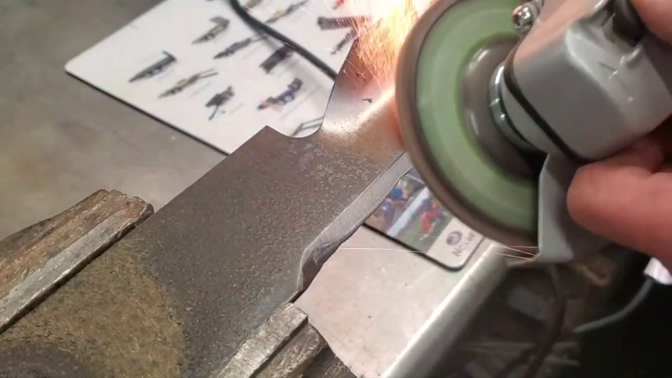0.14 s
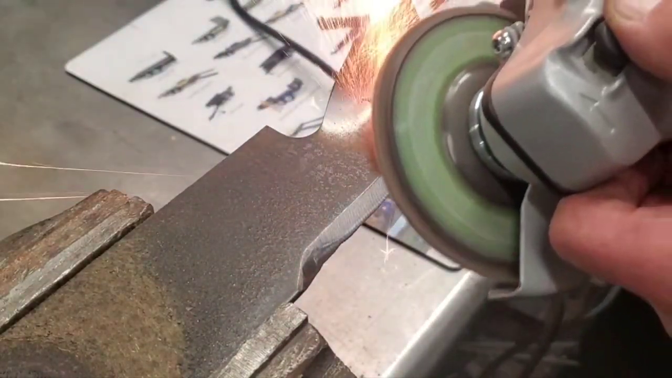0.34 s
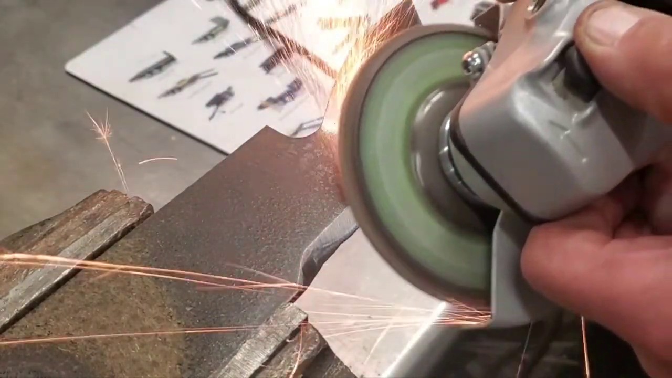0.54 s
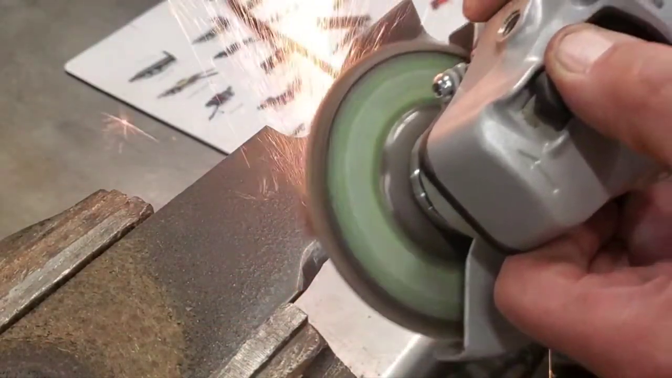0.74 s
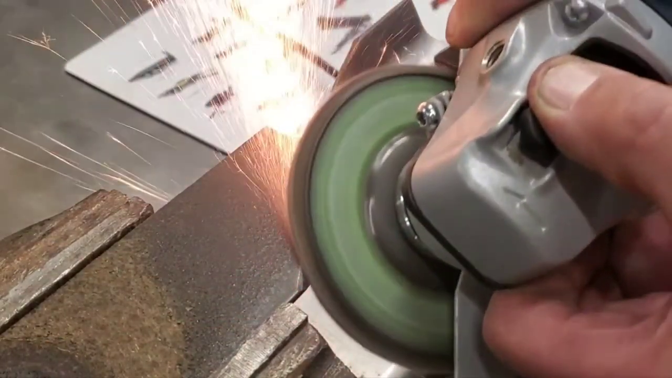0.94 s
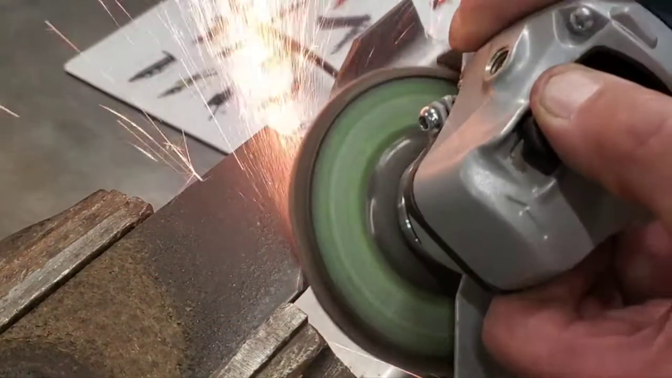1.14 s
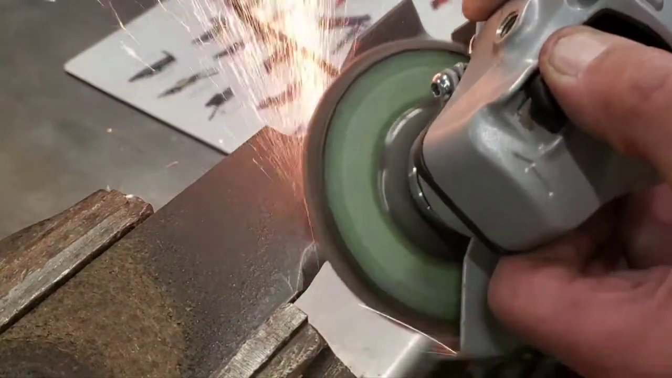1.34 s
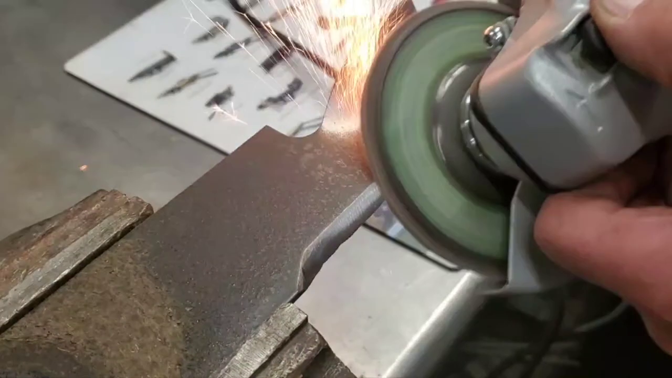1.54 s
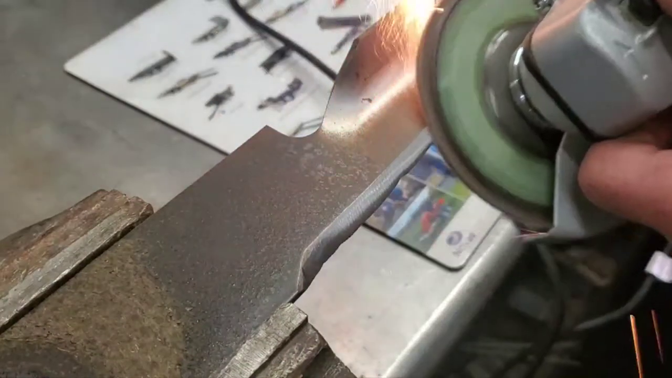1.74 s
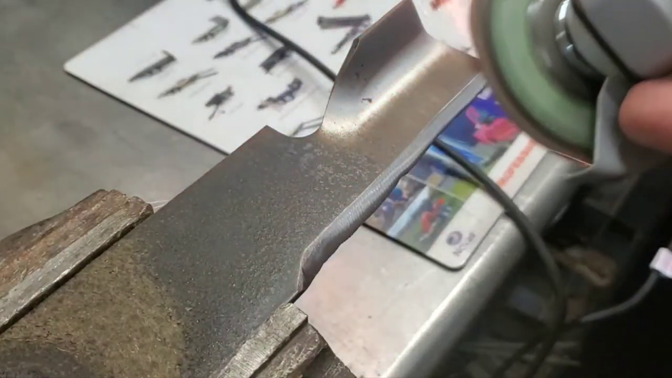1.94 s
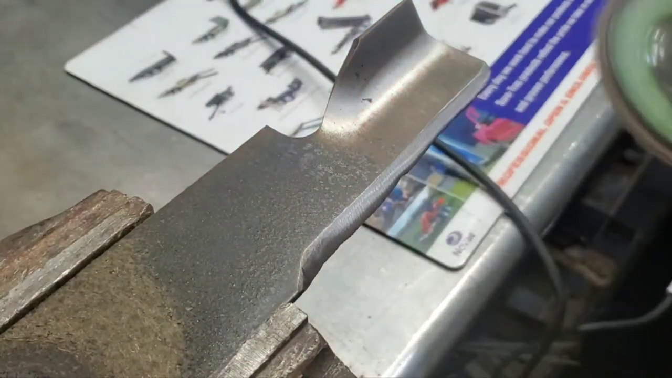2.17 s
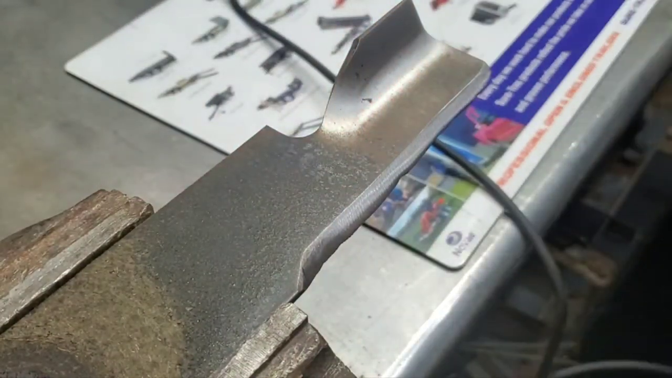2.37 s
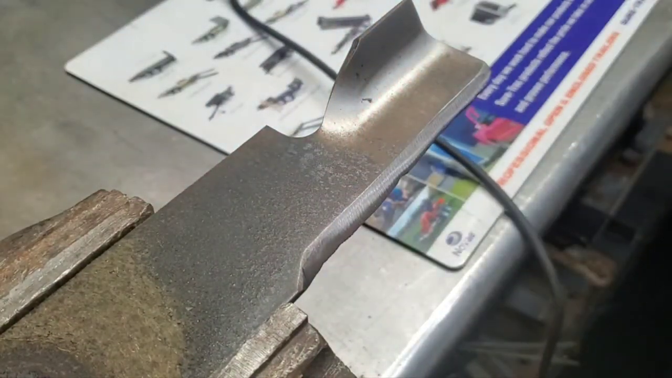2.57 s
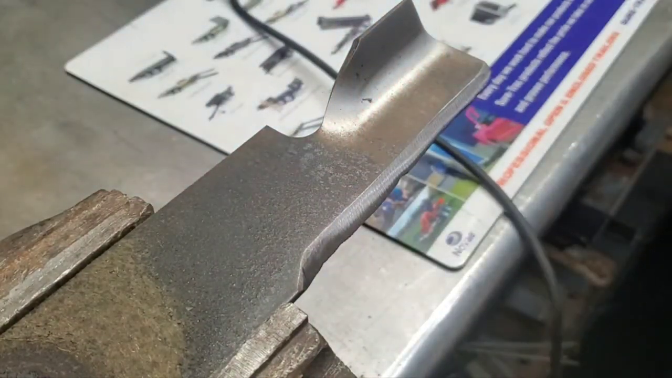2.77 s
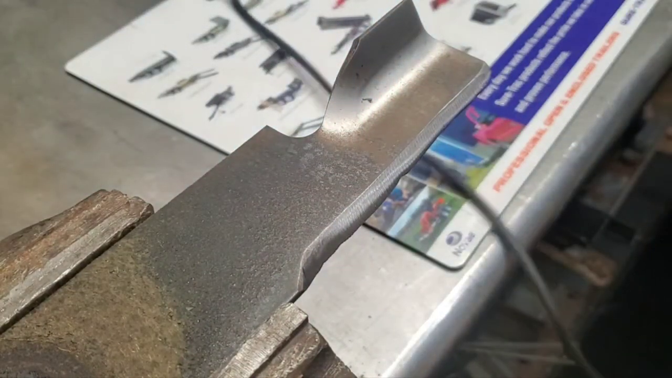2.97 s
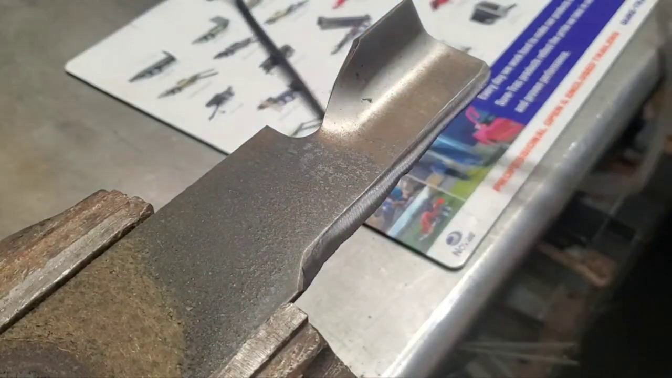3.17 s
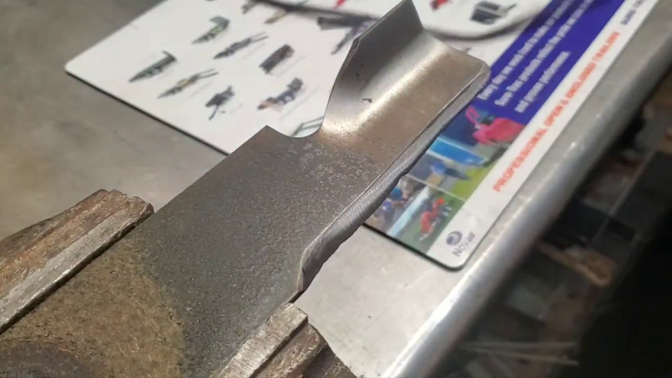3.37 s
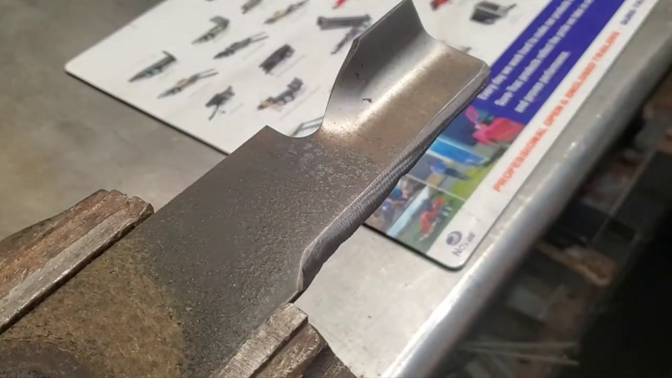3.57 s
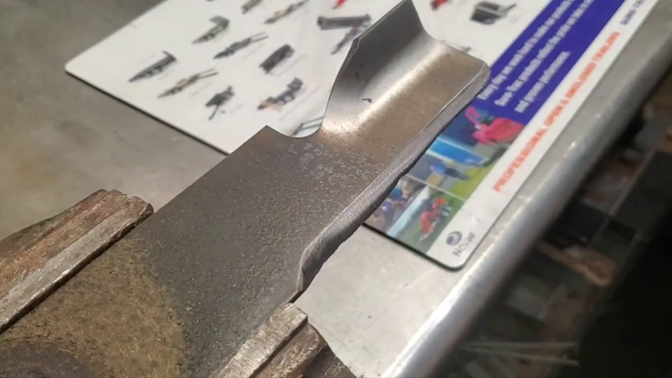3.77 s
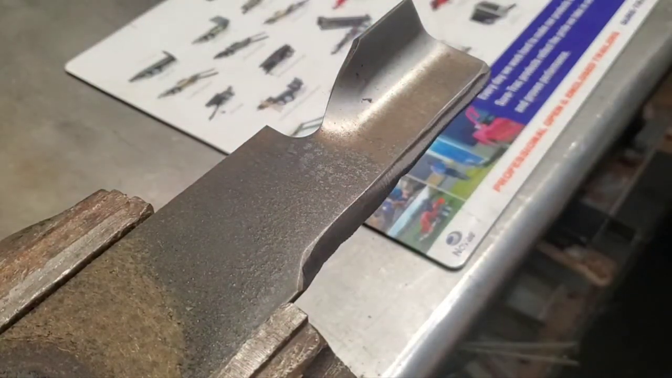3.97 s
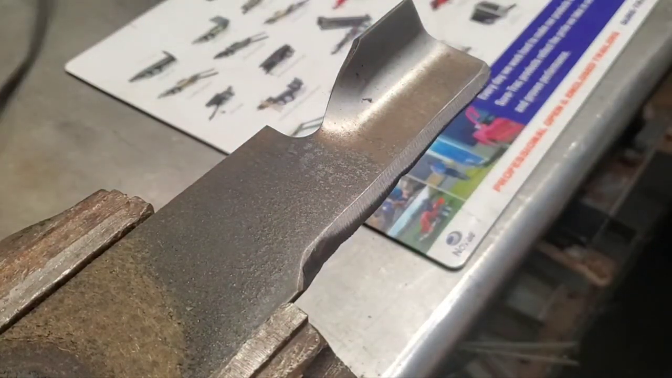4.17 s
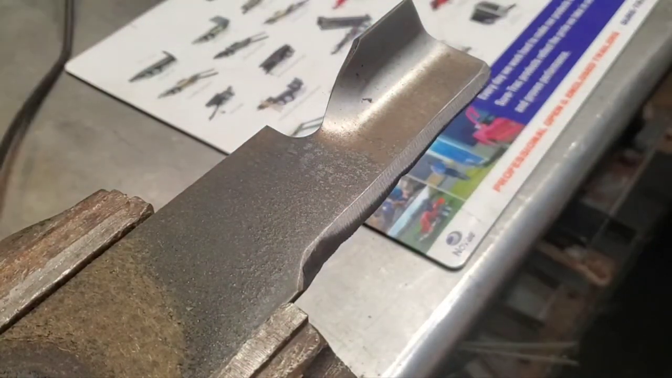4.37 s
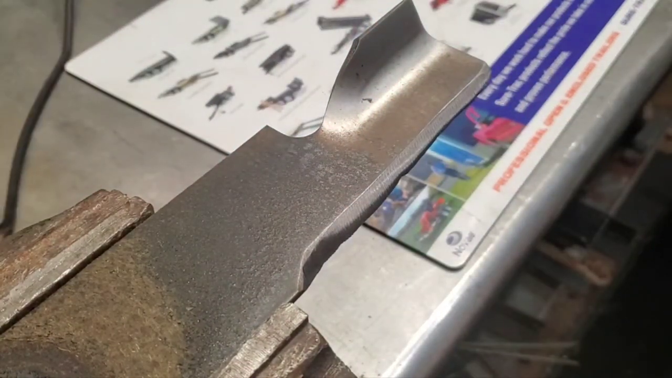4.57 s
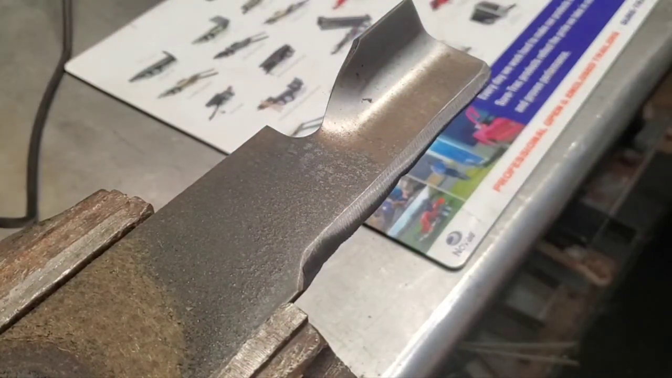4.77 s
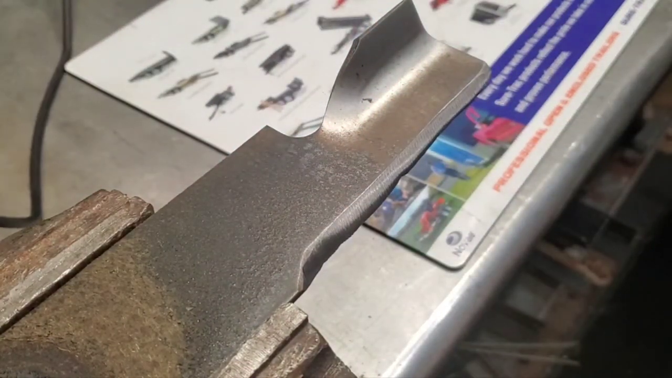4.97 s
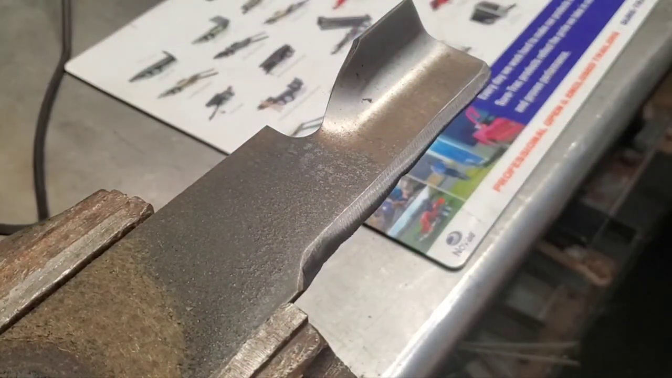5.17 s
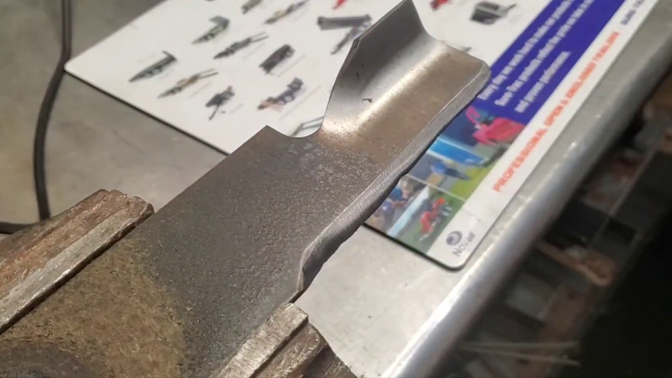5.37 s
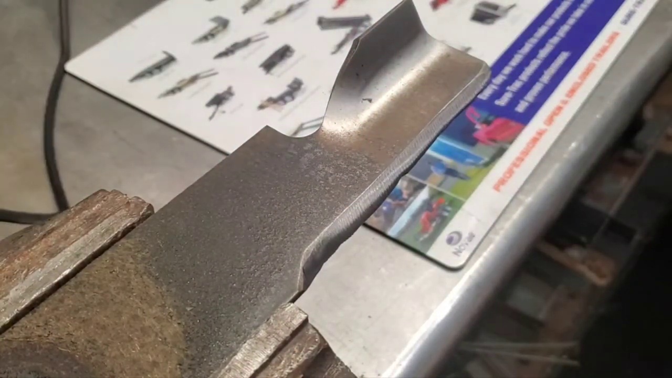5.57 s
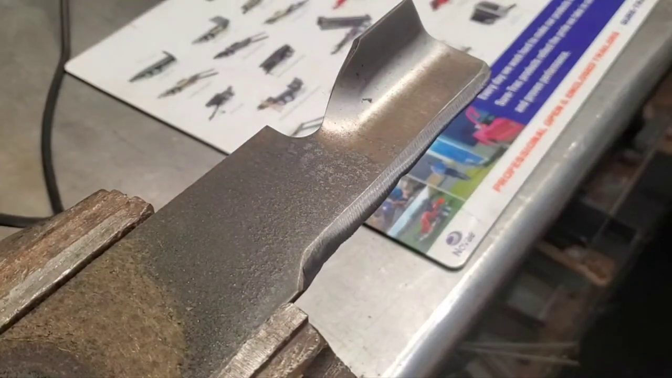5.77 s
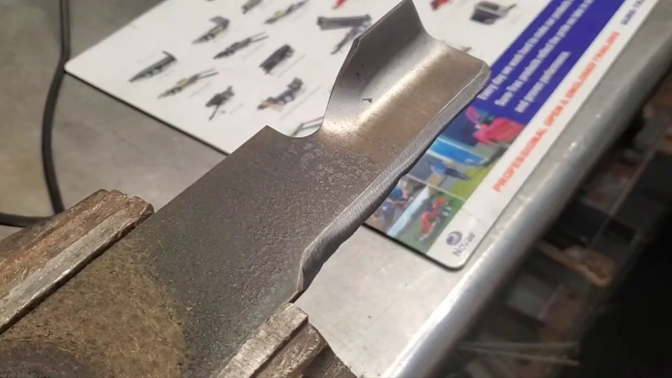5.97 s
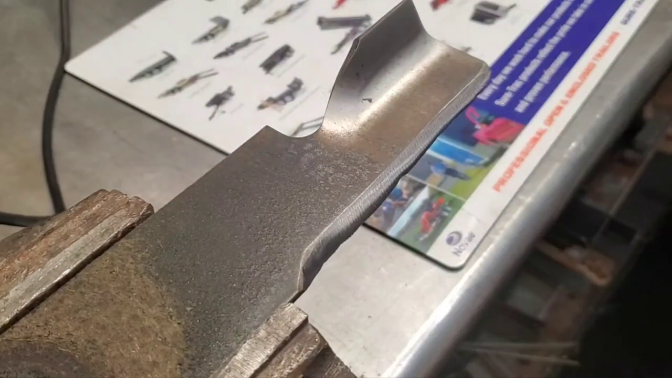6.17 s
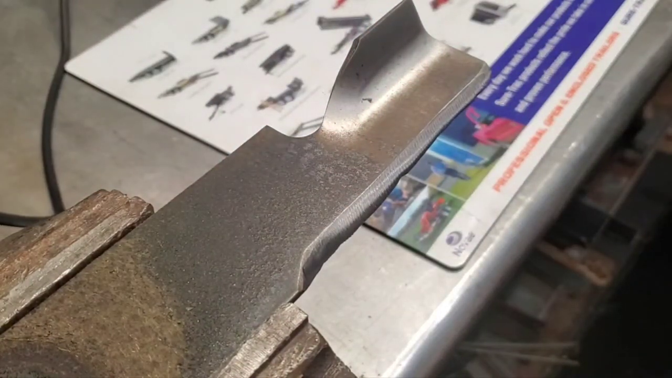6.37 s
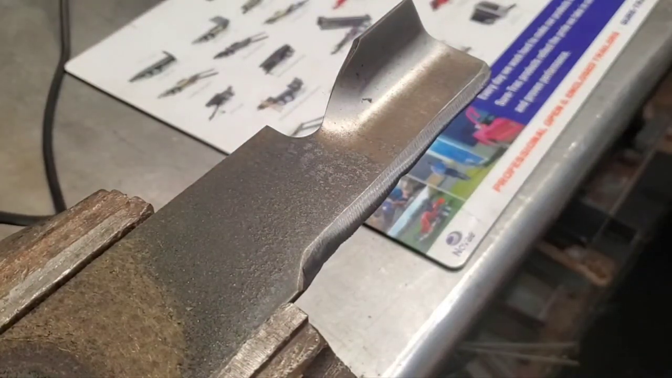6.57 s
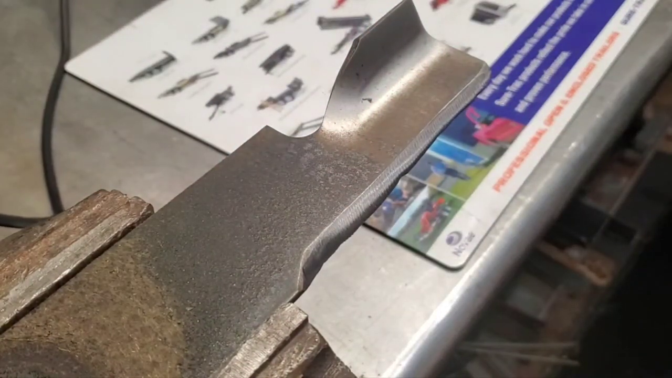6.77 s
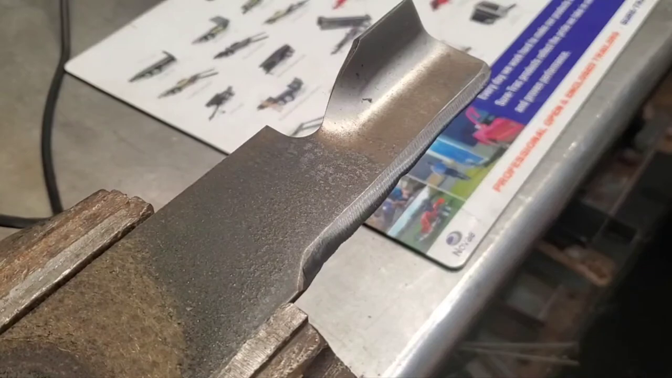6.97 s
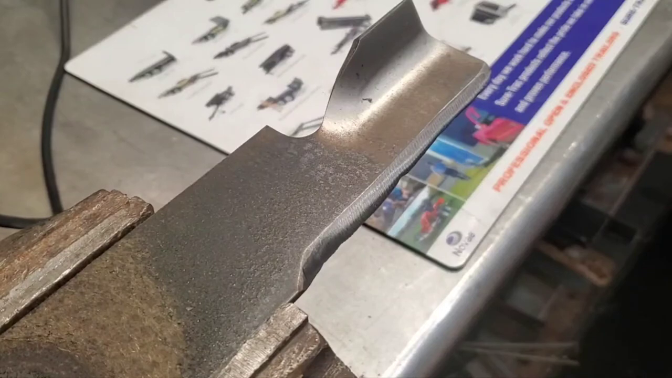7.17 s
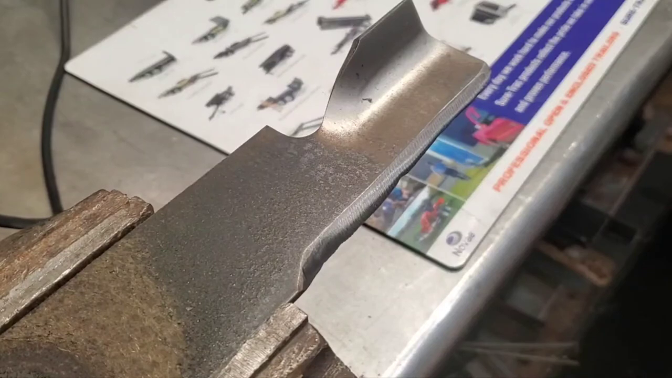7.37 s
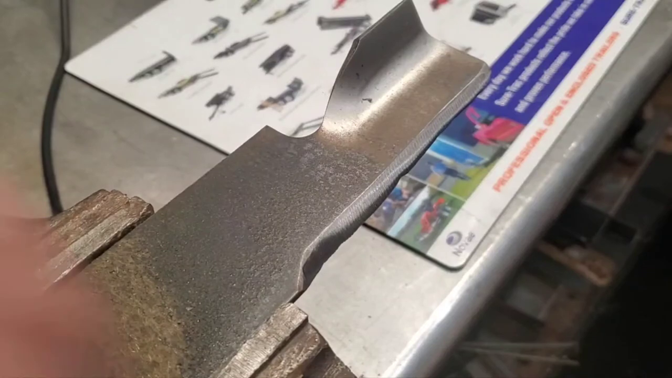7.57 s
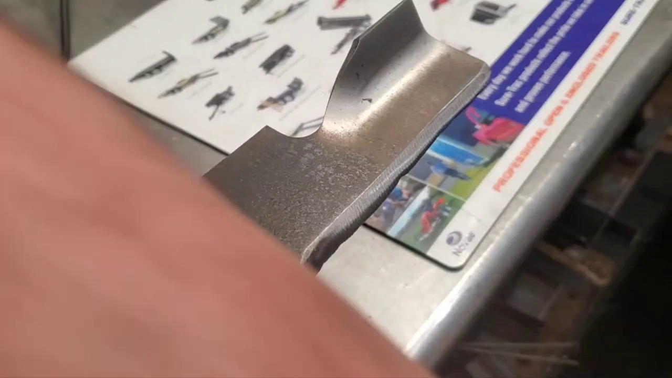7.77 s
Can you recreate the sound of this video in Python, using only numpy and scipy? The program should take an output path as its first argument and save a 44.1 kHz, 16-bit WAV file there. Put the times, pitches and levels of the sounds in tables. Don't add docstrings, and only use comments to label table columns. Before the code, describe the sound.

In a small garage, close stereo microphones catch an angle grinder biting a clamped steel blade with a harsh, gritty roar, singing gears and hissing sparks. The motor bogs, lifts clear and coasts down, slack gears tapping, rattling and knocking ever slower. Thuds as it is set down, a few faint rubs, then it leaps back to speed with a buzzing jolt, runs free and is switched off.

```python
import sys
import numpy as np
from scipy import signal
from scipy.fft import rfft, irfft, next_fast_len
from scipy.io import wavfile
from scipy.ndimage import uniform_filter1d

SR = 44100
rng = np.random.default_rng(int(sys.argv[2]) if len(sys.argv) > 2 else 0)


def voltage_ratio(level):
    return 10 ** (np.asarray(level, float) / 20)


def pcm_store(signal):
    levels = np.round(np.clip(np.atleast_2d(signal), -1, 1) * 32767)
    wavfile.write(sys.argv[1], SR, levels.astype(np.int16).T)


N = 345296
TIME_S = np.arange(N) / SR

TEETH, DISC_RATIO = 9, 9 / 32
EASE_S, LIFT_S, OFF_S = 1.94, 2.17, 2.24
ON_S, OFF_AGAIN_S = 6.462, 7.69
# start_s, turns_hz
LOADED_SPEED = [
    (0, 486),
    (.56, 451),
    (.7, 446.5),
    (.98, 442.3),
    (1.12, 435.5),
    (1.36, 413.5),
    (1.82, 408.5),
    (2.1, 409),
    (2.24, 422),
]


def evened(x):
    return x / np.sqrt(np.mean(x ** 2) + 1e-20)


def curves(rows):
    s, *columns = np.transpose(sorted(rows))
    return [np.interp(TIME_S, s, column) for column in columns]


def law(rows, speed):
    hz, *columns = np.transpose(sorted(rows))
    return np.array([np.interp(speed, hz, column) for column in columns])


def ramp(start_s, length_s):
    return np.clip((TIME_S - start_s) / length_s, 0, 1)


def wander(hz):
    span = int(SR / hz)
    return evened(uniform_filter1d(uniform_filter1d(rng.standard_normal(N), span), span))


def colour(x, points, lo_hz=1, hi_hz=22000):
    size = next_fast_len(N)
    hz = np.fft.rfftfreq(size, 1 / SR)
    point_hz, point_db = np.transpose(points)
    gain = voltage_ratio(np.interp(np.log(hz + 1), np.log(point_hz + 1), point_db))
    gain = gain / np.sqrt(np.mean(gain ** 2 * (hz > lo_hz) * (hz < hi_hz)))
    return irfft(rfft(x, size) * gain, size)[..., :N]


def resonate(x, hz, width):
    turn = np.exp(2j * np.pi * np.cumsum(hz * np.ones(len(x))) / SR)
    r = np.exp(-np.pi * abs(width) / SR)
    return 2 * (turn * signal.lfilter([1 - r], [1, -r], x / turn)).real


def steep_band(x, hz, width, second_width=None):
    return evened(resonate(resonate(x, hz, width), hz, second_width or width))


def add(mix, start_s, sound):
    part = mix[round(start_s * SR):][:len(sound)]
    part += sound[:len(part)]


def motor():
    drag_s, friction_hz = 3.0, 200
    top_hz, quick_hz, quick_s, creep_hz, creep_s = 600.5, 270, .17, 245, 1.4

    def run_up(s):
        quick = quick_hz * np.exp(-((s - ON_S) / quick_s) ** 1.32)
        return top_hz - quick - creep_hz * np.exp((ON_S - s) / creep_s)

    def run_down(hz, s):
        return np.maximum((hz + friction_hz) * np.exp((s - TIME_S) / drag_s) - friction_hz, 0)

    loaded = curves(LOADED_SPEED)[0]
    coasting = run_down(LOADED_SPEED[-1][1], OFF_S)
    restart = run_up(np.maximum(TIME_S, ON_S))
    last_coast = run_down(run_up(OFF_AGAIN_S), OFF_AGAIN_S)
    stages = [TIME_S < OFF_S, TIME_S < ON_S, TIME_S < OFF_AGAIN_S]
    return np.select(stages, [loaded, coasting, restart], last_coast)


def effort(speed):
    # start_s, case_db, fan_and_sparks_db, mesh_share_db, twice_mesh_share_db
    grinding = [
        (0, -22, -26.5, -4, -18),
        (.08, -20, -22.5, 0, -36),
        (.25, -18.5, -20, 5, -33),
        (.6, -19, -24.5, 2, -2.5),
        (1.0, -21, -23, -4.5, -9),
        (1.2, -21, -22.5, -7, -11),
        (1.8, -23.5, -23, -4, -18),
        (2.0, -28.5, -21, -20, -26),
        (2.16, -19.5, -25.5, 7.5, -22),
    ]
    restart = [(6.468, -29, -33, -10, -13), (6.486, -19.5, -40, -20, -8), (6.55, -19, -37, 3, 1),
               (6.61, -17.5, -36, 8, 4), (6.65, -19.5, -35, 5, 4), (6.68, -22.5, -34, 3, -12),
               (6.76, -20.5, -29, -1, -7), (6.95, -22, -28, -5, -16), (7.27, -24.5, -32, -3, -32),
               (7.7, -26.5, -32, -20, -25), (7.83, -29.5, -33.5, -12, -23)]
    # armature_hz, then the same four levels
    coasting = [(0, -61, -70, -23, -12.5), (26.2, -44.5, -61, -18, -3), (53, -47.5, -56, 1, 10),
                (76.5, -38.5, -59, -9, -18), (136, -33.5, -49, -12.5, -1), (185, -39.5, -54, -6, 1),
                (230, -38, -52, -5, 4), (280, -38.5, -47, -4, -3), (366, -32, -41, -1, -10),
                (420, -29, -37.5, -8, -10)]
    lifted, on = ramp(LIFT_S, 0.046), ramp(ON_S, 0.011)
    return (1 - lifted) * curves(grinding) + (lifted - on) * law(coasting, speed) + on * curves(restart)


def patchy(x):
    z = signal.stft(x, nperseg=512)[2]
    field = uniform_filter1d(rng.standard_normal(z.shape[1:]), size=4, axis=0)
    field = evened(uniform_filter1d(field, size=24, axis=1))
    return signal.istft(z * voltage_ratio(2 * field), nperseg=512)[1][:, :N]


def mains_beat(on):
    mains_hz, loaded_depth, start_depth, fade_s = 120, 0.16, 0.75, 0.5
    since = np.maximum(TIME_S - ON_S, 0)
    depth = loaded_depth * (1 - ramp(EASE_S, OFF_S - EASE_S)) + on * start_depth * np.exp(-since / fade_s)
    cycle = mains_hz * TIME_S + .85
    strength = voltage_ratio(rng.standard_normal(int(cycle[-1]) + 1))[cycle.astype(int)]
    return 1 - np.clip(depth, 0, 1) * (1 - 4.0 * strength * np.exp(-(cycle % 1) / .2))


def start_rings(pairs, teeth, speed, on):
    # mode_hz, width_hz, strongest_s, level_db, fall_db_per_s
    start_modes = [
        (1900, 400, 6.54, -26, 130),
        (5750, 1200, 6.62, -23, 40),
        (6840, 200, 6.82, -27, 80),
    ]
    rings = np.zeros(N)
    for hz, width, s, db, fall in start_modes:
        level = voltage_ratio(curves([(ON_S, db - 2), (s, db), (s + 1, db - fall)])[0])
        rings += level * steep_band(pairs, hz, width)
    whine = on * voltage_ratio(-27.5) * np.clip((speed - 370) / 60, 0, 1) ** 2
    return rings * ramp(ON_S + 0.0044, 0.0067) + whine * steep_band(teeth, 4020, 330)


def gear_case(speed, case_db, hiss_db, mesh_db, twice_db):
    # point_hz, density_db
    case_spectrum = [(590, -23), (1000, -19.5), (1200, -14.5), (1470, -10), (1900, -1.5), (2470, -3.5),
                     (4310, 4), (5010, -1.5), (5450, -4.5), (6160, -8.5), (6900, -5), (7940, -16.5),
                     (9500, -61), (12400, -25), (20900, -120)]
    hiss_spectrum = [(4470, -20), (7600, -5.5), (9050, -1.5), (10600, -0.5), (11600, 1.5), (13400, 0.5),
                     (15000, 0), (15800, -6)]
    # from_s, to_s, level_db
    fan_blast = (6.92, 7.28, 7.9)
    blast_from_s, blast_to_s, blast_db = fan_blast
    on = ramp(ON_S, 0.0029)

    slack = (1 - on) * (1 - np.minimum(speed / LOADED_SPEED[-1][1], 1)) ** 2
    grit_db = 1.5 + 5 * slack
    wobble_db = 5 * (ramp(OFF_S, 1.0) - on) * np.cos(2 * np.pi * np.cumsum(DISC_RATIO * speed) / SR)
    hits = rng.standard_normal((5, N)) * voltage_ratio(grit_db * wander(500) + wobble_db) * mains_beat(on)
    hits, teeth, pairs, *sides = hits / np.sqrt(uniform_filter1d((hits ** 2).mean(0), size=4000))
    sides = np.array(sides)

    mesh_hz = TEETH * speed
    mesh = steep_band(teeth, mesh_hz, 480, 550)
    twice = steep_band(pairs, 2 * mesh_hz, 550, 800)
    thrice_level = voltage_ratio(-8) * (ramp(OFF_S, .8) - on)
    twice = twice + thrice_level * steep_band(hits, 3 * mesh_hz, 900)
    case = colour(0.45 * hits + 0.92 * sides, case_spectrum, 1500, 5600)
    case = case + voltage_ratio(mesh_db) * mesh + voltage_ratio(twice_db) * twice
    case = case / np.sqrt(1 + voltage_ratio(2 * mesh_db) + voltage_ratio(2 * twice_db))

    hiss_db = hiss_db + blast_db * (ramp(blast_from_s, 0.0063) - ramp(blast_to_s, 0.0046))
    air = .5 * hits + .5 * sides + 0.73 * rng.standard_normal((2, N))
    hiss = colour(air, hiss_spectrum, 7860, 16000)
    body = patchy(voltage_ratio(case_db) * case + voltage_ratio(hiss_db) * hiss)
    return body, start_rings(pairs, teeth, speed, on)


def tones(speed):
    # armature_hz, armature_tone_db, disc_tone_db
    hum_law = [(20, -86, -90), (213, -65.5, -69), (273, -63, -62), (320, -55.5, -62), (390, -52, -59.5),
               (408, -39.5, -56.5), (425, -39, -51), (515, -39.5, -56.5)]
    # armature_hz, mesh_tone_db, twice_mesh_tone_db
    song_law = [(380, -60, -60), (408, -30, -37), (413, -26, -31), (424, -26, -42), (436, -28, -50),
                (445, -27, -58), (452, -23, -53), (463, -26, -51), (474, -24, -51), (486, -30, -57)]
    # armature_multiple, disc_multiple, level_db against the mesh tone
    side_tones = [(9, -1, -3), (9, 1, -5), (9, -2, -11), (9, 2, -9), (9, -3, -12), (9, 3, -12), (8, 0, -8),
                  (8, -1, -10), (8, 1, -14), (10, 0, -8), (10, -1, -10), (10, 1, -14)]
    armature_db, disc_db = law(hum_law, speed)
    unloaded_db = -27 * ramp(EASE_S, OFF_S - EASE_S)
    mesh_db, twice_db = law(song_law, speed) + unloaded_db
    turns = 2 * np.pi * np.cumsum(speed) / SR
    out = voltage_ratio(armature_db) * np.sin(turns) + voltage_ratio(disc_db) * np.sin(DISC_RATIO * turns)
    out += voltage_ratio(armature_db - 14) * np.sin(2 * turns + .6 * wander(20))

    rows = [(TEETH, 0, mesh_db), (2 * TEETH, 0, twice_db)]
    rows += [(2 * TEETH, 1, twice_db - 9), (2 * TEETH, -1, twice_db - 9)]
    rows += [(a, d, mesh_db + db - 2.0) for a, d, db in side_tones]
    for a, d, db in rows:
        phase = 2 * np.pi * rng.random() + .3 * wander(30)
        order = round(a) + round(d) * DISC_RATIO
        out += voltage_ratio(db + 1.5 + 2.6 * wander(12)) * np.sin(order * turns + phase)
    return np.sqrt(2) * out


def bench_rumble(case_db):
    # point_hz, density_db
    rumble_spectrum = [(88, -47), (150, -21), (247, -12), (341, -9.5), (670, -8), (955, -0.5), (1520, 0),
                       (1800, 1), (2340, -58), (3960, -120)]
    build_db = -22 * (ramp(ON_S, .01) - ramp(ON_S, 0.4))
    level = voltage_ratio(0.63 * case_db - 24.5 + build_db)
    return level * colour(rng.standard_normal(N), rumble_spectrum, 250, 1345)


def blade(speed):
    # start_s, blade_db, place along the edge (a factor on the blade modes)
    contact = [
        (0, -28, 0.98),
        (.3, -46, 1.15),
        (.75, -32.5, 1.05),
        (1.0, -33.5, 0.64),
        (1.2, -27.5, 1.16),
        (1.4, -28.5, 0.997),
        (2.12, -27, 0.99),
        (2.2, -97, 0.15),
    ]
    # mode_hz, width_hz, level_db
    blade_modes = [(580, 80, -11), (700, 100, -8), (930, 100, -11), (1270, 120, -4), (1500, 50, 2),
                   (1700, 200, -7), (2600, 300, -10)]
    db, place = curves(contact)
    turns = 2 * np.pi * np.cumsum(DISC_RATIO * speed) / SR + .02 * wander(25)
    strikes = sum(np.cos(k * turns + rng.uniform(0, 2 * np.pi)) for k in range(3, 26))
    drive = evened(strikes) + .5 * rng.standard_normal(N)
    body = evened(sum(voltage_ratio(g) * resonate(drive, hz * place, w) for hz, w, g in blade_modes))

    sing_hz, sing_width_hz, sing_db = 1502, 10, -29.5
    match = 1 / (1 + ((12 * DISC_RATIO * speed - sing_hz) / sing_width_hz) ** 2)
    sing = voltage_ratio(sing_db) * (1 - ramp(LIFT_S, .03)) * match * np.sqrt(2) * np.sin(12 * turns)
    return sing + voltage_ratio(db) * body


def edge():
    # mode_hz, width_hz, start_s, level_db
    edge_modes = [(7450, 99, 0.92, -37.5), (8300, 100, 1.25, -36.5), (8820, 110, 1.7, -34.5),
                  (11000, 120, 1.3, -46), (12200, 120, 2.05, -48), (13170, 100, 2.2, -42),
                  (14300, 120, 1.0, -37)]
    out = np.zeros(N)
    for hz, width, s, db in edge_modes:
        ring = evened(resonate(rng.standard_normal(N), hz, width))
        out += voltage_ratio(db + 3.2 * wander(8)) * ramp(s, 0.091) * ring
    return (1 - ramp(LIFT_S, 0.035)) * out


def background():
    # point_hz, density_db
    floor_spectrum = [(15, -38), (25, -51), (92, -12), (159, -54), (433, 11), (766, 11), (4360, 1.5),
                      (7920, -16), (10500, -19), (16500, -24)]
    a, b = rng.standard_normal((2, N))
    return voltage_ratio(-55) * colour(np.array([a, 0.87 * a + 1.2 * b]), floor_spectrum)


def garage(x):
    # band_hz, t60_s
    decay_times = [(200, 0.1), (1000, 0.21), (4000, 0.2), (12000, 0.03)]
    echoes = np.zeros((2, SR // 2))
    at = np.arange(60, SR // 2 - 20, 20)
    at = at + rng.integers(0, 20, (2, len(at)))
    np.put_along_axis(echoes, at, rng.choice([-1., 1.], at.shape), 1)
    hz, t, z = signal.stft(echoes, SR, nperseg=256)
    t60 = np.interp(hz, *np.transpose(decay_times))[:, None]
    tail = signal.istft(z * voltage_ratio(-60 * t / t60), SR, nperseg=256)[1]
    return signal.fftconvolve(x[None], tail / np.linalg.norm(tail[0]), axes=1)[:, :N]


def placed(bright, deep):
    # start_s, left_late_samples, left_right_db
    tool_path = [(0, 2.5, 0.5), (.75, 2.5, 2), (1.25, -0.5, 2.5), (1.9, 1, 1.5), (2.25, 7.5, -0.5),
                 (2.85, 16, -12.5), (3.2, 15, -4), (3.45, 4.5, 8), (4.05, 3, -0.5), (4.65, -9, 10.5),
                 (5.2, -19, 9), (6.4, -14.5, 7), (7.83, -17.5, 8)]
    late, pan_db = curves(tool_path)
    side = np.array([[.5], [-.5]])
    near = voltage_ratio(side * pan_db) * bright + voltage_ratio(0.35 * side * pan_db) * deep
    fine = np.arange(4 * N)
    ears = [np.interp(fine[::4] - 4 * k * late, fine, signal.resample_poly(ear, 4, 1))
            for ear, k in zip(near, side)]
    return np.array(ears)


def taps():
    # start_s, peak_db, ring_hz
    tap_table = [(2.4618, -20, 4080), (2.4917, -17, 3260), (2.4964, -16, 3230), (2.5084, -18, 3240),
                 (2.5174, -19, 3460), (2.5374, -16, 3220), (2.5446, -13, 3220), (2.5504, -16, 3190),
                 (2.5584, -17, 3610), (2.5704, -17, 3260), (2.596, -19, 3280), (2.6214, -20, 3140),
                 (2.6424, -19, 3110), (2.7487, -20, 2830), (2.8005, -19, 2790), (2.8144, -20, 2830),
                 (2.8804, -20, 2870), (2.8964, -22, 5330), (2.9104, -20, 2860), (2.9213, -20, 5060),
                 (2.9344, -22, 5520), (3.0021, -22, 4930), (3.032, -26, 1920), (3.0444, -28, 2060),
                 (3.1068, -24, 4400), (3.1174, -23, 4880), (3.1482, -21, 4940), (3.1554, -23, 4900),
                 (3.1906, -24, 4500), (3.2074, -24, 4340), (3.2494, -28, 4400), (3.2674, -26, 4350),
                 (3.3004, -24, 4010), (3.3224, -26, 2810), (3.3298, -24, 4370), (3.3464, -24, 4130),
                 (3.3624, -27, 4140), (3.3827, -24, 4170), (3.4386, -20, 2010), (3.4474, -20, 2250),
                 (3.4574, -23, 4100), (3.495, -25, 1870), (3.5464, -20, 1950), (3.5563, -18, 1940),
                 (3.5694, -23, 3990), (3.6117, -22, 3330), (3.6371, -21, 3330), (3.6496, -19, 3330),
                 (3.6664, -24, 3180), (3.6965, -21, 3200), (3.7085, -20, 3170), (3.7244, -17, 3200)]
    low_hz, low_from_s, t60_s = 1940, 3.24, .015
    out, t = np.zeros(N), np.arange(1500) / SR
    for s, db, hz in tap_table:
        a, b = rng.uniform(-1.7, 1, 2)
        ring = np.sin(2 * np.pi * hz * t) + .4 * np.sin(2 * np.pi * hz * (1.08 + .03 * a) * t)
        ring += .45 * rng.standard_normal(len(t))
        ring += (s > low_from_s) * .9 * np.sin(2 * np.pi * low_hz * (1 + .04 * b) * t)
        sound = ring * voltage_ratio(-60 * t / t60_s) * np.minimum(t / .0008, 1)
        add(out, s, voltage_ratio(db + 1) * sound / abs(sound).max())
    return out


def chatter():
    # middle_s, level_db, length_s, ring_hz
    chatter_bouts = [(2.545, -44, 0.17, 3210), (3.3, -41, 0.48, 2080), (3.605, -47.5, 0.45, 1920),
                     (7.242, -26, 0.064, 5230), (7.338, -19, 0.043, 4700), (7.414, -18, 0.048, 4400),
                     (7.497, -21, 0.046, 4930), (7.552, -19, 0.053, 4870), (7.607, -17.5, 0.039, 4560),
                     (7.66, -19, 0.039, 4840), (7.826, -24, 0.021, 4300)]
    level = sum(voltage_ratio(db) * np.exp(-((TIME_S - s) / (0.35 * length)) ** 2)
                for s, db, length, _ in chatter_bouts)
    hz = curves(chatter_bouts)[-1]
    hits = rng.standard_normal(N) * voltage_ratio(3.5 * wander(400))
    sizzle = evened(resonate(hits, 12300, 1300))
    return level * (steep_band(hits, hz, 730) + voltage_ratio(-9.5) * sizzle)


def knock_times(speed):
    # start_s, peak_db, ring_hz
    coasting_knocks = [(3.7594, -19, 3320), (3.7974, -15, 3250), (3.8077, -13, 3260), (3.8234, -14, 3080),
                       (3.8496, -13, 3140), (3.8574, -13, 3270), (3.8681, -13, 3640), (3.8681, -10, 4300),
                       (3.916, -19, 4130), (3.9489, -17, 3300), (3.9809, -17, 4190), (4.0093, -16, 3270),
                       (4.0422, -19, 2220), (4.0514, -23, 4100), (4.0692, -21, 3840), (4.1081, -15, 2340),
                       (4.154, -16, 3150), (4.1664, -10, 4360), (4.1754, -12, 3280), (4.1899, -9, 4390),
                       (4.2034, -11, 3230), (4.2423, -12, 3130), (4.2901, -15, 3080), (4.3131, -14, 2570),
                       (4.3306, -15, 2350), (4.346, -11, 3740), (4.3604, -15, 2660), (4.3764, -16, 3740),
                       (4.3909, -15, 3640), (4.4054, -15, 3660), (4.4413, -17, 3440), (4.4692, -16, 3440),
                       (4.5022, -16, 3320), (4.5461, -17, 3120), (4.574, -16, 4430), (4.5925, -15, 4590),
                       (4.6124, -13, 3570)]
    last_knocks = [(4.6339, -17, 3570), (4.6514, -18, 2300), (4.7082, -8, 3260), (4.7277, -17, 3540),
                   (4.7354, -17, 3350), (4.793, -15, 2170), (4.8075, -16, 2880), (4.8204, -12, 4370),
                   (4.8529, -14, 4570), (4.8773, -10, 4100), (4.8938, -12, 5160), (4.9367, -16, 4540),
                   (4.9556, -17, 4340), (4.9614, -19, 3640), (4.9856, -17, 3980), (5.021, -18, 4440),
                   (5.0409, -19, 4180), (5.0998, -8, 4460), (5.1198, -14, 4460), (5.1432, -12, 2190),
                   (5.1906, -25, 2230), (5.2086, -18, 4540), (5.2174, -19, 2110), (5.2674, -27, 3010),
                   (5.2969, -25, 4880), (5.3258, -23, 2240), (5.3314, -24, 3510), (5.3877, -37, 2290),
                   (5.44, -40, 5100), (5.5, -44, 5000)]
    # start_s, peak_db of the hardest mains blows of the run-up
    mains_blows = [(6.4773, -16), (6.4778, -12), (6.4833, -11), (6.4923, -11), (6.5008, -9), (6.5262, -10),
                   (6.5592, -10), (6.5966, -15), (6.6006, -13), (6.618, -9), (6.6435, -11), (6.6514, -10),
                   (6.6769, -15), (6.7018, -10), (6.7357, -14), (6.7522, -14), (6.7936, -12), (6.8355, -13)]
    # from_s, to_s
    tick_span = (3.78, 4.62)
    turns = np.flatnonzero(np.diff(np.floor(np.cumsum(DISC_RATIO * speed) / SR))) / SR
    turns = turns[(turns > tick_span[0]) & (turns < tick_span[1])]
    late, size, pitch = rng.standard_normal((len(turns), 3)).T
    ticks = np.transpose([turns + 0.0032 * late, -29 + 3 * size, 3200 * (1 + .2 * pitch)])
    fore = [(s - .013, db - 14, hz) for s, db, hz in last_knocks if db > -9]
    blows = [(s, db - 1, 5700) for s, db in mains_blows]
    return [*coasting_knocks, *last_knocks, *ticks, *fore, *blows]


def knocks(speed):
    # mode_hz, width_hz, level_db
    case_modes = [(550, 48, 1.5), (2094, 190, 20), (2527, 99, 20), (3272, 180, 26), (3976, 47, 23.5),
                  (4060, 75, -23), (4860, 49, 21), (6970, 52, -2.5), (8000, 33, -90), (11240, 300, -5)]
    bright_s = 4.66
    out, t = np.zeros(N), np.arange(1200) / SR
    hz, _, mode_db = np.transpose(case_modes)[:, :, None]
    for s, db, main_hz in knock_times(speed):
        a, b = rng.standard_normal((2, len(hz), 1))
        low, high = rng.standard_normal((2, len(t)))
        rings = voltage_ratio(mode_db - 6 + 3.0 * a - 60 * t / .018) * np.sin(2 * np.pi * hz * (1 + .07 * b) * t)
        main = voltage_ratio(-60 * t / .012) * np.sin(2 * np.pi * main_hz * t)
        crack = 6.5 * resonate(resonate(low, 3400, 4000), 3400, 4000) * voltage_ratio(-60 * t / .014)
        thump = 0.18 * voltage_ratio(-60 * t / 0.067) * np.sin(2 * np.pi * 520 * t)
        tick = (0.7 if s > bright_s else 0.25) * resonate(high, 14000, 5000) * voltage_ratio(-60 * t / 0.008)
        sound = (rings.sum(0) + 2.4 * main + crack + tick + thump) * np.minimum(t / .0003, 1)
        add(out, s, voltage_ratio(db + 2.5) * sound / abs(sound).max())
    return out


def rattle():
    # start_s, level_db, length_s
    rattle_bouts = [
        (3.8, -24.5, 0.067),
        (4.156, -32, 0.034),
        (4.327, -36, 0.058),
    ]
    # mode_hz, width_hz, level_db
    rattle_modes = [(1920, 360, -11), (3100, 350, 0.5), (4300, 260, 2.5), (6270, 700, -7),
                    (7380, 470, -4.5), (11700, 5000, -16)]
    out, t = np.zeros(N), np.arange(SR // 2) / SR
    for s, db, length in rattle_bouts:
        coarse = evened(uniform_filter1d(rng.standard_normal(len(t)), size=150))
        hits = rng.standard_normal(len(t)) * voltage_ratio(5 * coarse)
        rings = sum(voltage_ratio(g) * steep_band(hits, hz, w) for hz, w, g in rattle_modes)
        envelope = np.clip(np.minimum(t / .004, 1 + (length - t) / 0.038), 0, 1)
        add(out, s, voltage_ratio(db) * envelope * evened(rings))
    return out


def handling():
    # start_s, peak_db, pitch_hz, t60_s
    thuds = [
        (4.05, -18, 574, 0.16),
        (4.248, -28, 373, 0.28),
        (4.808, -22, 890, 0.23),
        (6.481, -20.5, 556, 0.17),
    ]
    # start_s, level_db, length_s, pitch_hz
    rubs = [
        (5.7, -46.5, 0.1, 2400),
        (5.883, -41, 0.1, 600),
        (6.078, -40.5, 0.11, 1160),
        (6.392, -42, 0.072, 1610),
    ]
    out, t = np.zeros(N), np.arange(6000) / SR
    for s, db, hz, t60 in thuds:
        puff = steep_band(rng.standard_normal(len(t)), hz, 670)
        add(out, s, voltage_ratio(db - 5.5 - 60 * t / t60) * puff * np.minimum(t / 0.0033, 1))
    for s, db, length, hz in rubs:
        noise = rng.standard_normal(len(t))
        rub = steep_band(noise, hz, 3400, 3600) + 0.097 * evened(resonate(noise, 410, 60))
        swell = t / length * 4
        add(out, s, voltage_ratio(db) * rub * swell * np.exp(1 - swell))
    return out


def hand_stir():
    # middle_s, level_db, length_s
    grips = [
        (4.204, -45, 0.25),
        (4.858, -47.5, 0.2),
        (5.81, -55.5, 0.88),
    ]
    level = sum(voltage_ratio(db) * np.exp(-((TIME_S - s) / length) ** 2) for s, db, length in grips)
    return level * evened(resonate(rng.standard_normal(N), 65, 140))


def scene():
    speed = motor()
    levels = effort(speed)
    case, rings = gear_case(speed, *levels)
    bright = case + knocks(speed) + taps() + chatter() + rattle() + rings + edge()
    deep = tones(speed) + blade(speed) + bench_rumble(levels[0]) + handling()
    less_room = voltage_ratio(-4 * ramp(4.54, 0.4))
    room = voltage_ratio(-7.5) * garage(less_room * (bright.mean(0) + 0.76 * deep))
    return placed(bright, deep) + room + background() + hand_stir()


def roll_off(x):
    return signal.sosfilt(signal.butter(12, 16690, fs=SR, output="sos"), x)


def record(dry):
    soft = np.tanh(dry / .95) * .95
    band = signal.sosfiltfilt(signal.ellip(8, .2, 60, 15850, fs=SR, output="sos"), soft)
    band = signal.sosfilt(signal.butter(2, 60, "high", fs=SR, output="sos"), band)
    return roll_off(band)


dry = scene()
out = record(dry)
pcm_store(out)
```